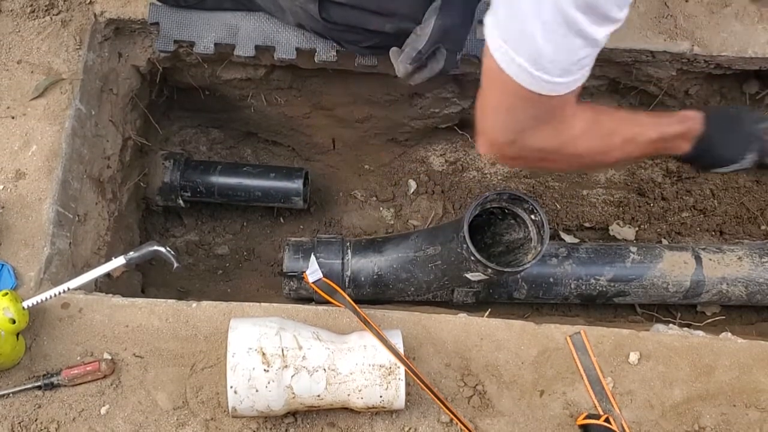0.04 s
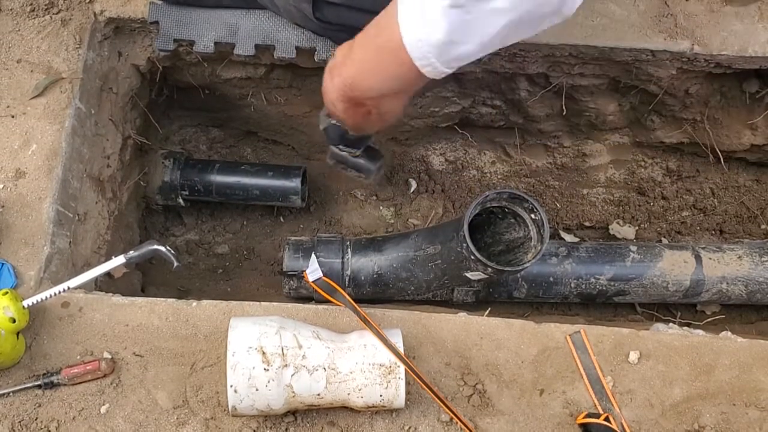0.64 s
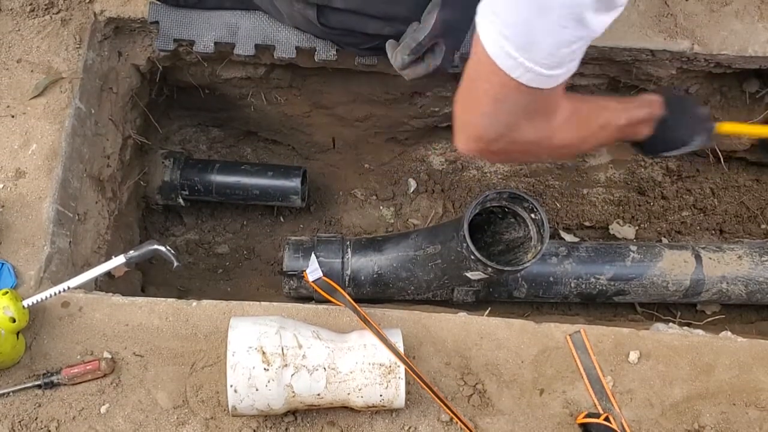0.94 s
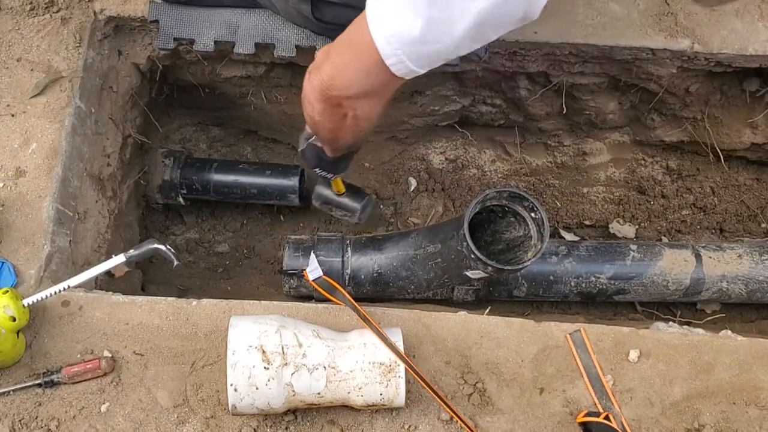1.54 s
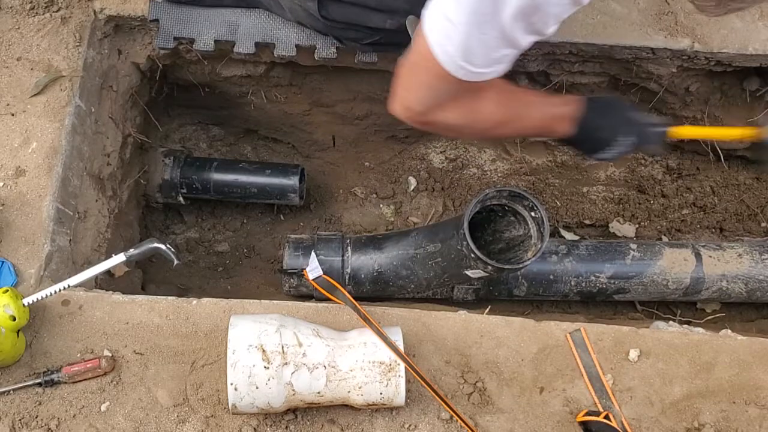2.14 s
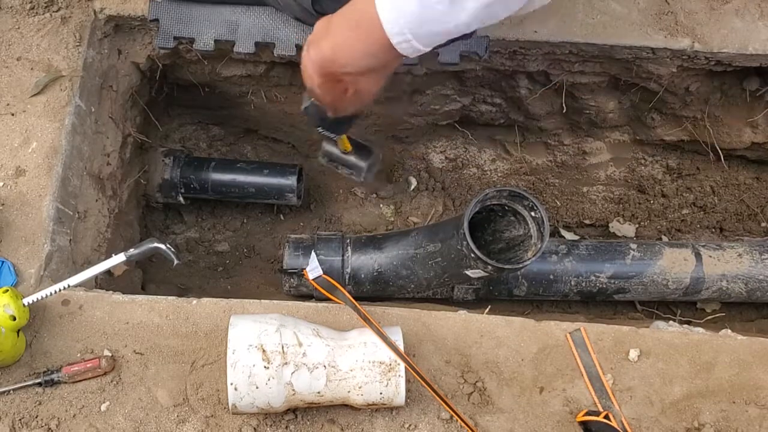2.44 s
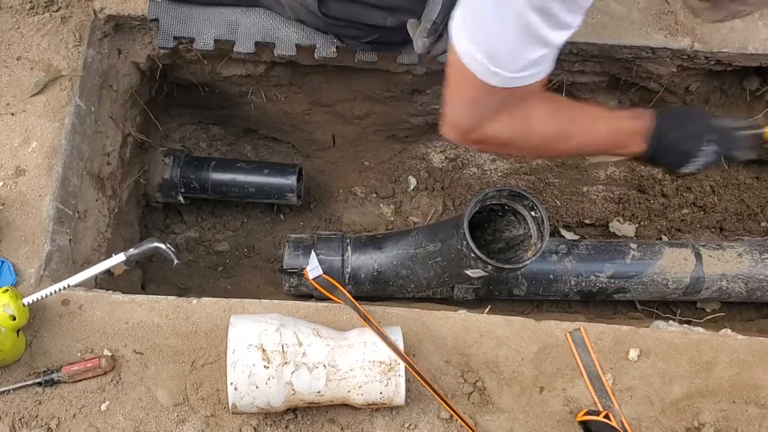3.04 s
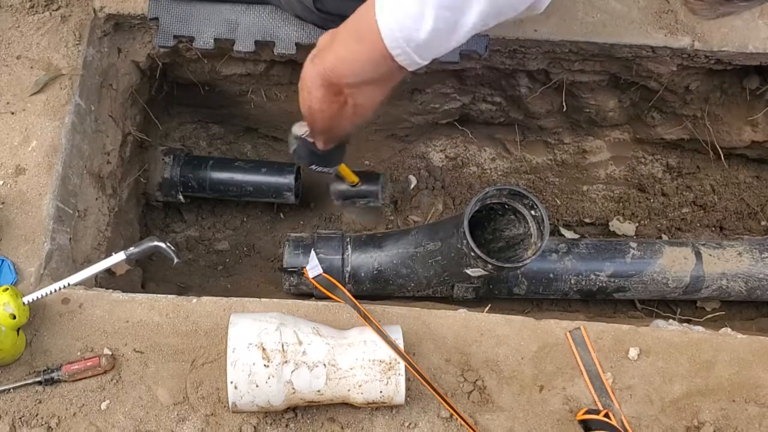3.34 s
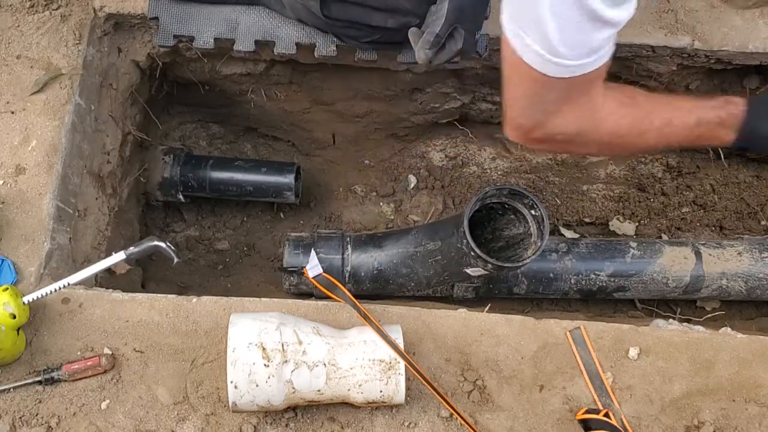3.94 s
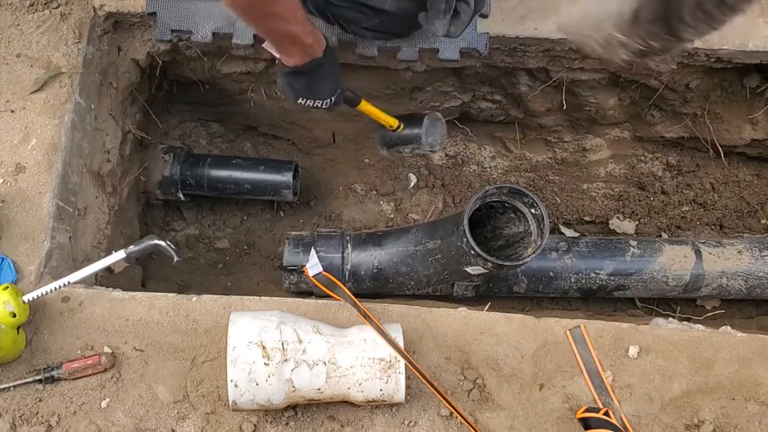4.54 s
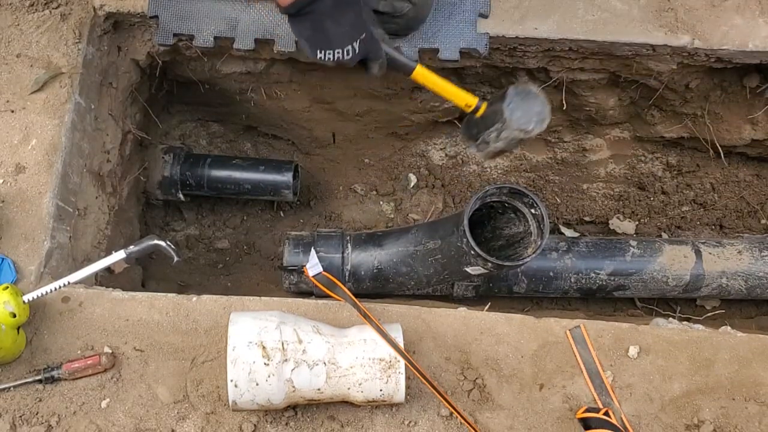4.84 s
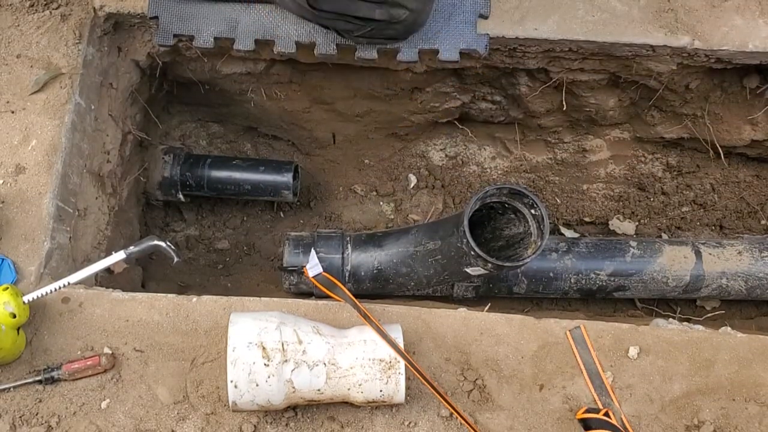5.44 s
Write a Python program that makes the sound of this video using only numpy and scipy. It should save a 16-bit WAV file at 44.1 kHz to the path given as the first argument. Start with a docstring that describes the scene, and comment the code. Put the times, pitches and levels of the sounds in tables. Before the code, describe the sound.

A rubber mallet drives a short plastic pipe into a buried drain with five evenly spaced blows, about one a second. Each is a sharp crack and hollow knock, with a brief falling pew ringing through the pipes. Grit ticks faintly between blows. Afterwards clothes rustle, with soft bumps and scuffs on a kneeling mat. It is heard close by in an outdoor earth trench, over a low distant rumble.

```python
"""An earth trench outdoors: over a low rumble, a rubber mallet drives a short plastic pipe into an old
buried drain with five blows. Each blow cracks in the joint, knocks the pipe wall and sets the air in
the pipes ringing, with a falling 'pew' from waves that zigzag across the bore. Grit ticks and a sleeve
swishes faintly between blows; then the worker shifts on a kneeling mat and clothes rustle."""
import sys
import numpy as np
from scipy import signal
from scipy.fft import rfft, irfft
from scipy.io import wavfile
from scipy.ndimage import uniform_filter1d

SR = 44100
rng = np.random.default_rng(int(sys.argv[2]) if len(sys.argv) > 2 else 0)


def put_to_file(sound):
    """Save the sound as 16-bit audio at rate SR, in the file named by the first command-line argument."""
    columns = np.atleast_2d(sound).T  # one column per channel
    safe = np.clip(columns, -1, 1)
    whole_steps = np.round(safe * 32767)
    wavfile.write(sys.argv[1], SR, whole_steps.astype(np.int16))


N = 246078
T = np.arange(SR) / SR  # the second that follows a hit


def gain_of(db):
    """Decibels to amplitude."""
    return 10 ** (np.asarray(db) / 20)


def unit_rms(x):
    """Scales to rms 1."""
    return x / np.sqrt(np.mean(x ** 2) + 1e-20)


def curve(points, hz):
    """Reads a table on a log-frequency axis."""
    f, value = np.transpose(points)
    return np.interp(np.log(hz + 1), np.log(f + 1), value)


def add(mix, s, sound):
    """Lays a stereo sound into the mix at time s."""
    part = mix[:, round(s * SR):][:, :sound.shape[1]]
    part += sound[:, :part.shape[1]]


def bins(x):
    """Frequencies of the spectrum of x."""
    return np.fft.rfftfreq(x.shape[-1], 1 / SR)


def eq(x, db):
    """Applies a gain for each frequency."""
    return irfft(rfft(x) * gain_of(db), x.shape[1])


def noise(spectrum, size):
    """Stereo noise of the given density, centred in the bass and wide in the treble."""
    # likeness of left and right: f/Hz, correlation
    likeness = [(60, 0.97), (250, 0.85), (500, 0.55), (1000, -0.1), (2000, 0.2), (4000, -0.11), (12000, 0)]
    white = rng.standard_normal((2, size))
    hz = bins(white)
    left, other = rfft(white)
    same = curve(likeness, hz)
    pair = np.array([left, same * left + np.sqrt(1 - same ** 2) * other])
    return irfft(pair * gain_of(curve(spectrum, hz)) * np.sqrt(SR / 2), size)


def burst(peak_s):
    """An envelope that swells to 1 at peak_s and dies away."""
    return T / peak_s * np.exp(1 - T / peak_s)


def outdoors(rumble_db=-42.5, hum_early_db=-8, hum_late_db=3):
    """A steady distant rumble; the open pipes sing faintly with it, more clearly at the end."""
    # rumble and hiss: f/Hz, relative level/dB
    rumble_spectrum = [(20, -34), (32, -21.5), (60, 0), (98, -6.5), (138, -6.5), (190, -14), (420, -23.5),
                       (720, -27.5), (1000, -34.5), (2000, -51.5), (4200, -56.5), (5200, -63.5),
                       (12400, -65.5), (16000, -72)]
    # hum of the open pipes: f/Hz, density/dB
    hum_spectrum = [(1400, -125), (1690, -103), (1950, -125), (2380, -101.5), (2500, -105), (2630, -101),
                    (2850, -115), (3500, -140)]
    rumble = gain_of(rumble_db) * unit_rms(noise(rumble_spectrum, N))
    hum_db = np.interp(np.arange(N) / SR, [4, 4.8], [hum_early_db, hum_late_db])
    return rumble + gain_of(hum_db) * noise(hum_spectrum, N)


def ring(modes, rise_s, lead_s, scatter_s):
    """Dying sines that build over rise_s, start up to scatter_s apart and reach the left side first."""
    hz, db, t60 = np.transpose(modes)[:, :, None]
    start = scatter_s * rng.random(hz.shape)
    sides = []
    for lag in (0, lead_s):
        t = np.maximum(T - start - lag, 0)
        envelope = gain_of(db - 60 * t / t60) * (1 - np.exp(-t / rise_s))
        sides.append((envelope * np.sin(2 * np.pi * hz * t)).sum(0))
    return np.array(sides)


def joint_crack(peak_s):
    """The pipe slips a little into its socket with a snap of noise."""
    # the crack: f/Hz, density/dB
    spectrum = [(60, -69.5), (400, -49), (900, -47), (1400, -48), (2000, -46.5), (3000, -53.5),
                (4200, -53.5), (5500, -60.5), (7000, -60), (8200, -65), (10500, -62.5), (16000, -74)]
    return noise(spectrum, SR) * burst(peak_s)


def with_echoes(knock, dull_hz=4500):
    """Trench wall and drain joints throw the knock back; the soil swallows the echoes' treble."""
    # early reflections: delay/s, level/dB
    reflections = [(.0051, -14), (0.0095, -8), (.026, -19)]
    out = knock.copy()
    dull = signal.lfilter(*signal.butter(1, dull_hz, fs=SR), knock)
    for s, db in reflections:
        add(out, s, gain_of(db) * dull)
    return out


def zigzag(lead_s=0.00007, wander_s=0.00044):
    """Cross waves crawl near their cut-off, so each echo is a chirp that falls onto that pitch."""
    # waves across the slightly oval bore: cut-off/Hz, level/dB, band half-width/Hz, t60/s
    cross_modes = [(2584, 10, 1200, .44), (2715, 9.5, 360, 0.3), (2775, 11, 570, .2),
                   (4380, -6.5, 300, .28), (5530, 6, 220, 0.18)]
    # joints and bends of the drain: round trip/s, level/dB
    joints = [(0.0116, -1), (.019, -8.5), (.026, -5), (.044, -15), (.0625, -23.5)]
    hz, echoes = bins(T), 0
    trips, trip_db = np.transpose(joints)[:, :, None]
    for cut_hz, db, width_hz, t60 in cross_modes:
        damped = hz - 1j * np.log(1000) / (2 * np.pi * t60)
        along = np.sqrt(cut_hz ** 2 - damped ** 2)  # nearly real below cut-off: the wave cannot travel
        band = gain_of(db) / (1 + ((hz - cut_hz) / width_hz) ** 2)
        paths = trips + wander_s * rng.uniform(-1.1, 1, trips.shape)  # the chirps beat anew each blow
        echoes = echoes + band * (gain_of(trip_db) * np.exp(-2 * np.pi * paths * along)).sum(0)
    return irfft([echoes, echoes * np.exp(-2j * np.pi * hz * lead_s)])


def diffuse(spectrum, t60s, rise_s):
    """Dense reflections that build over rise_s; each band dies at its own speed."""
    hz, t, bands = signal.stft(noise(spectrum, SR), SR, nperseg=1024, noverlap=768)
    decay = gain_of(-60 * t / curve(t60s, hz)[:, None])
    _, wash = signal.istft(bands * decay, SR, nperseg=1024, noverlap=768)
    return wash[:, :SR] * (1 - np.exp(-T / rise_s)) ** 2


def afterglow():
    """The quick wash of the trench, and the rough ring that swells out of the drain."""
    # sound scattered in drain and trench: f/Hz, density/dB; its decay: f/Hz, t60/s
    wash = [(30, -78.5), (65, -49), (200, -47.5), (450, -53.5), (900, -52.5), (1400, -61), (1850, -60),
            (2400, -63), (3200, -64), (4500, -68.5), (6000, -71), (8000, -74), (11000, -73), (16000, -87)]
    wash_t60 = [(80, 0.98), (250, 0.66), (700, 0.52), (1500, .33), (3000, 0.33), (6000, .25), (12000, 0.19)]
    # cross waves piled up above each cut-off after many trips: f/Hz, density/dB; decay: f/Hz, t60/s
    sing = [(2450, -110), (2560, -70), (2605, -42), (2670, -47.5), (2730, -44.5), (2840, -34), (2960, -44),
            (3150, -58), (4200, -89), (4480, -61.5), (5100, -89.5), (5640, -62.5), (6200, -100)]
    sing_t60 = [(2620, 0.39), (2730, 0.28), (2850, 0.2), (3100, .16), (4450, .27), (5600, 0.16)]
    return diffuse(wash, wash_t60, rise_s=0.00091) + diffuse(sing, sing_t60, rise_s=0.045)


def mallet(fresh_share=0.37):
    """Every blow wakes the same pipes and trench; the slip and part of the tail are new each time."""
    # blows: t/s, force/dB, wall/dB, air column/dB, cross waves/dB, crack/dB, crack rise/s, tail/dB,
    # then how squarely the head lands, heard as gain/dB at 1.6, 4.3 and 10 kHz
    blows = [(0.4724, 0, -4, -1, 3, -2, 0.0022, 0.5, 1.5, 2.5, 0),
             (1.4000, 0.5, 1, 2, 2, -0.5, 0.0023, 0.5, -1.5, 3, 1),
             (2.3297, 2, -0.5, -1, 6.5, -1.5, 0.0016, -2, 2.5, -2, 1),
             (3.2727, 3.5, 0, -1.5, 3, -5.5, 0.0021, -2, -1.5, 3, -3.5),
             (4.231, 1, 1, 2, 5, 2, 0.0025, -1.5, -1, 1.5, 6.5)]
    # where the landing of the head colours a blow, the lowest held at 0 dB: f/Hz
    contact_hz = [1000, 1600, 4300, 10000]
    # modes of the pipe wall, the air in the short pipe and the air in the drain: f/Hz, level/dB, t60/s
    wall_modes = [(698, -12, 0.054), (808.7, -1.5, 0.019), (902, -12, 0.017), (994, -22, 0.16),
                  (1307.4, -25.5, 0.092), (1359, -32.5, 0.17), (1650, -25.5, .06), (1827, -21.5, 0.1),
                  (2172, -23.5, 0.078), (3420, -26, .04), (4110, -23.5, 0.04)]
    column_modes = [(89.4, -20, 0.22), (160.3, -20, 0.11), (252.1, -15.5, 0.14), (328, -28, 0.11),
                    (400.6, -16, 0.13), (562.7, -19, 0.1), (680.6, -28, 0.17), (712, -27, 0.15),
                    (1092, -27.5, 0.19), (1140, -30.5, .12)]
    drain_modes = [(62.6, -42, 0.32), (117.7, -28.5, 0.37), (149, -27, 0.41), (164.6, -28, .5),
                   (186.3, -27, 0.26), (209.7, -31.5, 0.64), (231.7, -28, 0.63), (272.2, -31, 0.59),
                   (316.7, -26.5, 0.41), (382.3, -25.5, .36), (409.5, -26.5, .42), (457.7, -32, 0.59),
                   (457.5, -38, 0.14), (607, -35.5, 0.24), (684, -28.5, 0.16), (820, -30, 0.33),
                   (886, -35, 0.27), (907, -43.5, 0.13), (1014, -35, 0.22), (1156, -36.5, 0.33),
                   (1288, -43, 0.41), (1456, -46, 0.38), (1770, -43, 0.44), (1920, -44, 0.4),
                   (2140, -52.5, 0.5)]
    # stereo balance: f/Hz, left minus right/dB
    balance = [(100, -0.5), (500, 0.5), (1000, 2), (2000, 3), (3000, 2.5), (5000, 3), (7000, 5.5),
               (9500, -4.5), (13000, 3)]
    wall = ring(wall_modes, rise_s=0.0013, lead_s=0.00009, scatter_s=0.0002)
    column = ring(column_modes, rise_s=0.0023, lead_s=0.00016, scatter_s=0.002)
    drain = ring(drain_modes, rise_s=0.0099, lead_s=0.0001, scatter_s=0.02)
    common_glow = afterglow()
    out = np.zeros((2, N))
    for s, force_db, wall_db, column_db, cross_db, crack_db, peak_s, tail_db, *contact_db in blows:
        knock = with_echoes(gain_of(wall_db) * wall + gain_of(crack_db) * joint_crack(peak_s))
        air = gain_of(column_db) * column + gain_of(cross_db) * zigzag()
        tail = drain + np.sqrt(1 - fresh_share) * common_glow + np.sqrt(fresh_share) * afterglow()
        blow = np.zeros((2, N))
        add(blow, s, knock + air + gain_of(tail_db) * tail)
        colour = list(zip(contact_hz, [0, *contact_db]))
        out += eq(blow, force_db + curve(colour, bins(blow)))
    side_db = curve(balance, bins(out)) / 2
    return eq(out, [side_db, -side_db])


def small_knocks(bump_s=0.005, tick_s=0.0021):
    """Dull bumps and scuffs on the mat and ticks of loose grit, each a short burst of noise."""
    # soft bumps on the kneeling mat: t/s, gain/dB; their thud: f/Hz, density/dB
    bumps = [(4.518, -9), (4.58, -2), (4.594, 0)]
    bump_spectrum = [(50, -58), (150, -48.5), (280, -61.5), (500, -64.5), (900, -64.5), (1300, -77.5),
                     (1800, -79), (3000, -99), (15000, -104)]
    # knees and sleeves scuffing: t/s, level/dB, rise/s; their tone: f/Hz, relative level/dB
    scuffs = [(1.901, -62, 0.0087), (4.486, -52, 0.028), (4.67, -63, 0.0076), (4.9, -62, 0.026),
              (5.119, -53.5, 0.0033), (5.166, -74, 0.025), (5.195, -56, 0.005), (5.499, -65, .06)]
    scuff_spectrum = [(300, -4), (900, 7.5), (1700, 6.5), (2100, -10), (4200, -17), (5500, -20.5),
                      (15000, -35)]
    # ticks of grit: t/s, level/dB; their tone: f/Hz, relative level/dB
    grit = [(0.612, -57), (1.016, -68), (1.112, -65), (1.791, -65), (3.885, -65.5), (4.582, -44.5),
            (4.590, -45), (4.784, -58), (4.879, -61), (4.946, -64), (4.986, -62), (5.004, -67),
            (5.133, -74.5), (5.163, -60)]
    tick_spectrum = [(500, -40), (3000, -8), (5500, -5.5), (10000, -6), (15500, -9)]
    out = np.zeros((2, N))
    for s, db in bumps:
        add(out, s, gain_of(db) * noise(bump_spectrum, SR) * burst(bump_s))
    for s, db, peak_s in scuffs:
        add(out, s, gain_of(db) * unit_rms(noise(scuff_spectrum, SR)) * burst(peak_s))
    for s, db in grit:
        add(out, s, gain_of(db) * unit_rms(noise(tick_spectrum, SR)) * burst(tick_s))
    return out


def sleeve(growth_db_per_s=114):
    """On three downswings a faint swish grows as the arm gathers speed and stops as the mallet lands."""
    # downswings at the moment of landing: t/s, level/dB
    swings = [(1.4, -61), (2.33, -72.5), (4.231, -69.5)]
    # the swish: f/Hz, relative level/dB
    spectrum = [(1500, -7.5), (4000, -5), (7000, -11), (10000, -6.5), (12500, -1.5), (15500, -5.5)]
    t = np.arange(N) / SR
    level = sum((t < s) * gain_of(db - growth_db_per_s * abs(s - t)) for s, db in swings)
    return level * unit_rms(noise(spectrum, N))


def rustle(grain_db=1.5, attack_s=0.031, release_db_per_s=126):
    """A faint hiss, then cloth and glove rubbing in tiny catches; each swells, holds and dies away."""
    # a faint, brief hiss after the fourth blow, then strokes of cloth as the worker straightens up:
    # t/s, length/s, level/dB
    swells = [(3.362, 0.3, -68), (4.358, .11, -63.5), (4.469, 0.1, -51.5), (4.62, 0.064, -69),
              (4.74, .24, -72), (5.08, .085, -59)]
    # the rustle: f/Hz, relative level/dB
    spectrum = [(200, 10.5), (800, 13), (1700, 7.5), (2400, 5), (3200, 5), (6000, -1.5), (10000, -0.5),
                (15500, -2.5)]
    t, level = np.arange(N) / SR, 0
    for s, length, db in swells:
        attack = np.clip((t - s) / attack_s, 0, 1) ** 2
        level = level + attack * gain_of(db - release_db_per_s * np.maximum(t - s - length, 0))
    grain = unit_rms(uniform_filter1d(rng.standard_normal(N), 130))  # grains of about 3 ms
    return level * unit_rms(noise(spectrum, N) * gain_of(grain_db * grain))


def scene():
    """Blows and small movements over the outdoor rumble."""
    return mallet() + rustle() + small_knocks() + outdoors() + sleeve()


def record(dry, edge_hz=16300):
    """The microphone ports colour the treble, the loudest peaks are rounded and the very top is cut."""
    # colour of the ports: f/Hz, gain/dB
    ports = [(6200, -0.5), (6900, 1.5), (7800, -2), (9300, 1.5), (11000, -0.5)]
    coloured = eq(dry, curve(ports, bins(dry)))
    rounded = coloured / (1 + coloured ** 8) ** (1 / 8)  # soft clip at full scale
    low_pass = signal.firwin(511, edge_hz, window=("kaiser", 9), fs=SR)
    return signal.oaconvolve(rounded, low_pass[None], "same")


dry = scene()
out = record(dry)
put_to_file(out)
```